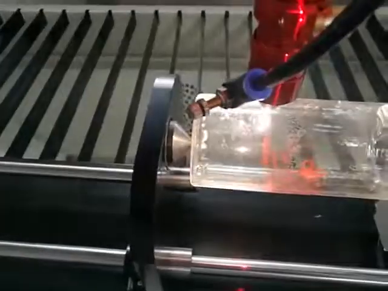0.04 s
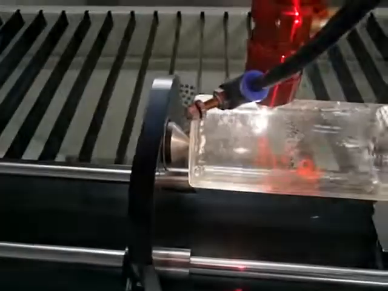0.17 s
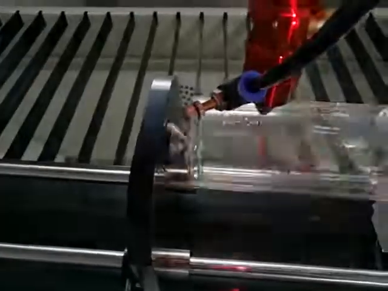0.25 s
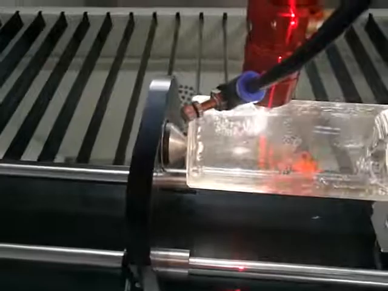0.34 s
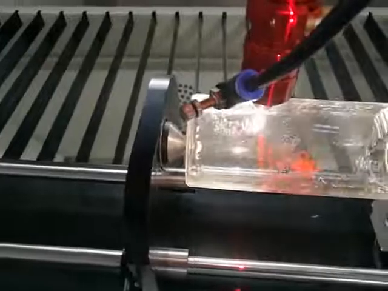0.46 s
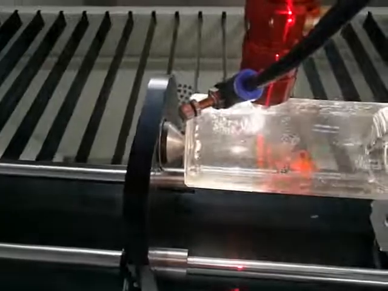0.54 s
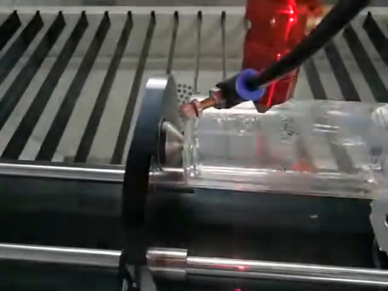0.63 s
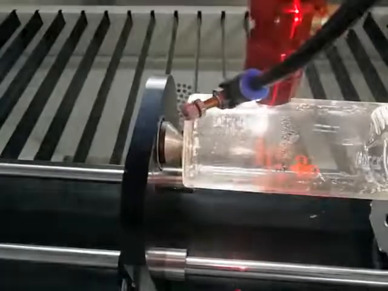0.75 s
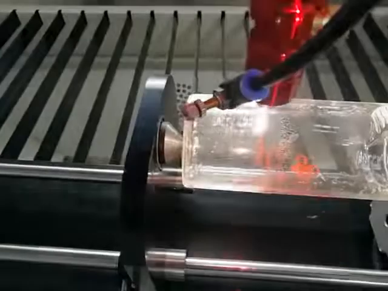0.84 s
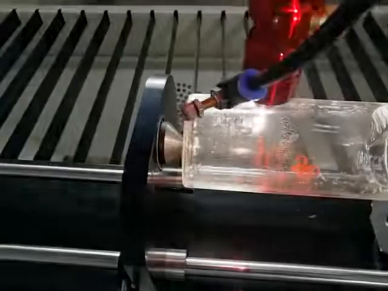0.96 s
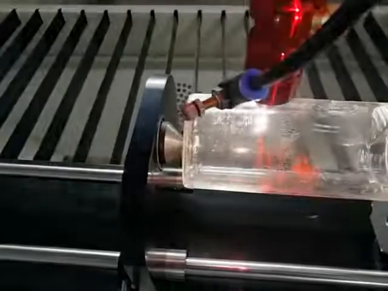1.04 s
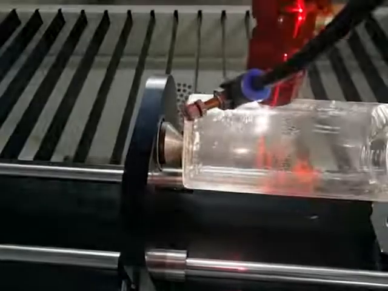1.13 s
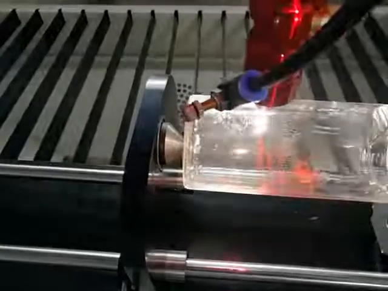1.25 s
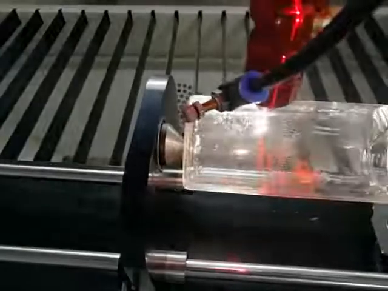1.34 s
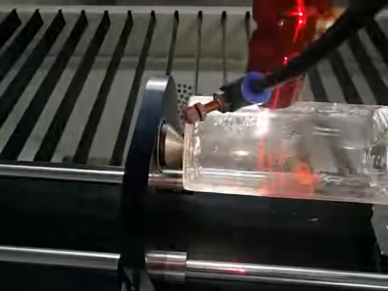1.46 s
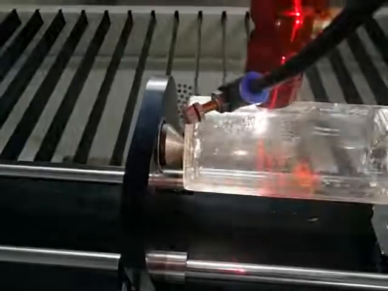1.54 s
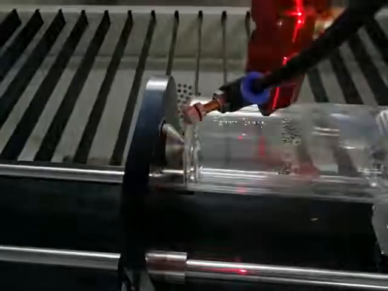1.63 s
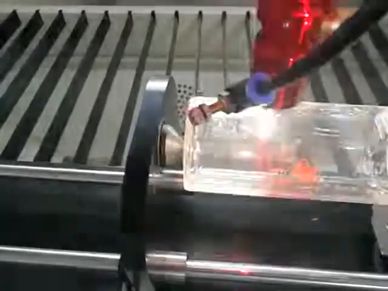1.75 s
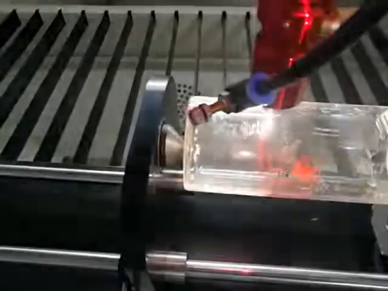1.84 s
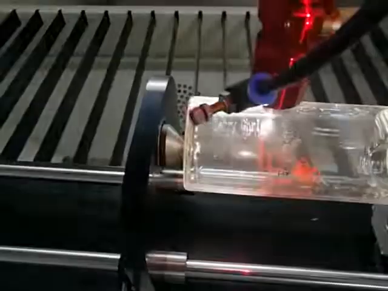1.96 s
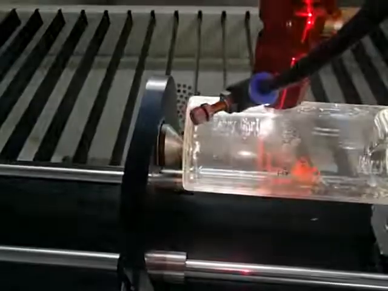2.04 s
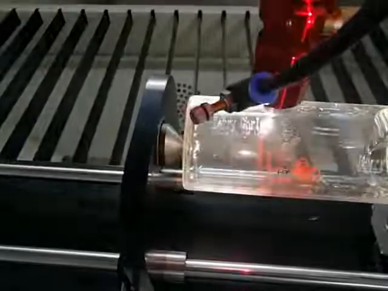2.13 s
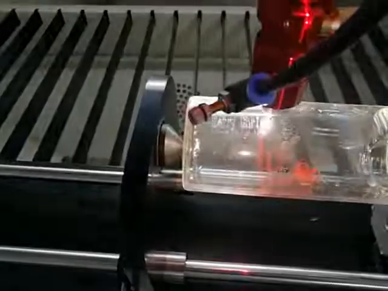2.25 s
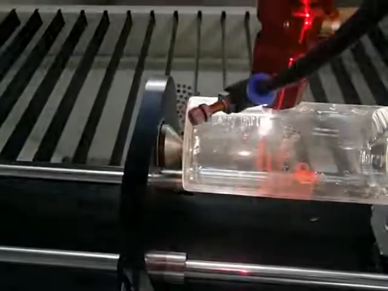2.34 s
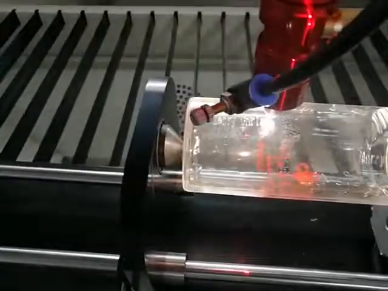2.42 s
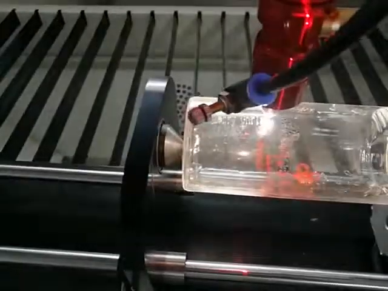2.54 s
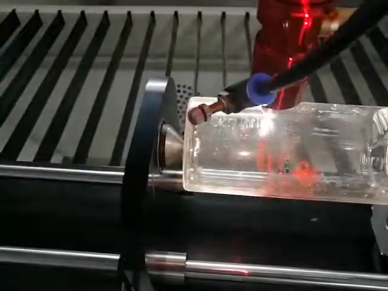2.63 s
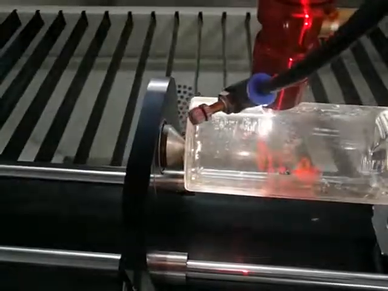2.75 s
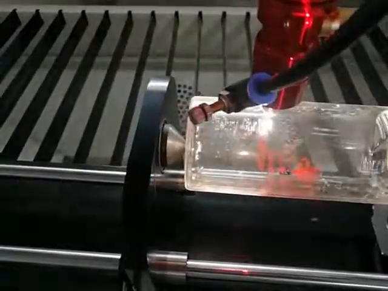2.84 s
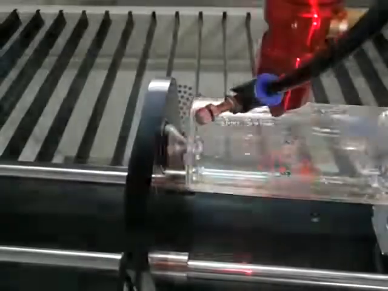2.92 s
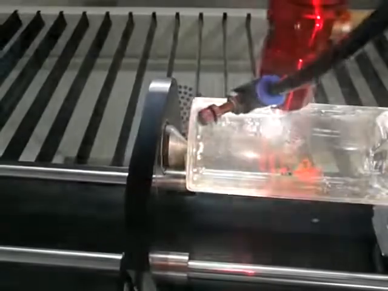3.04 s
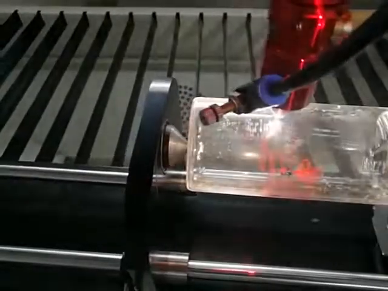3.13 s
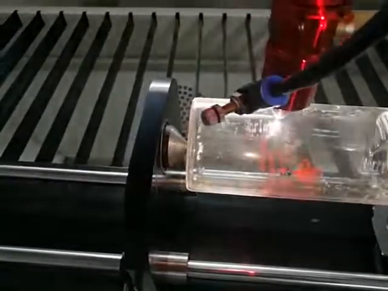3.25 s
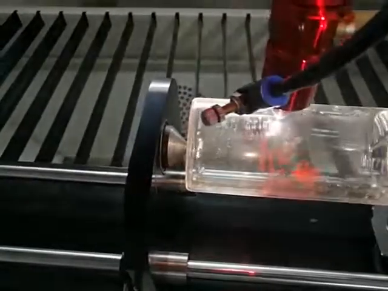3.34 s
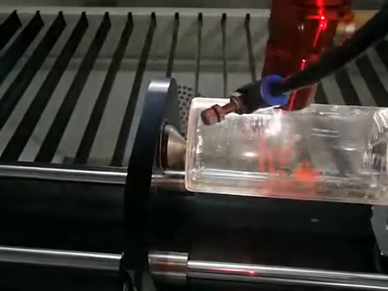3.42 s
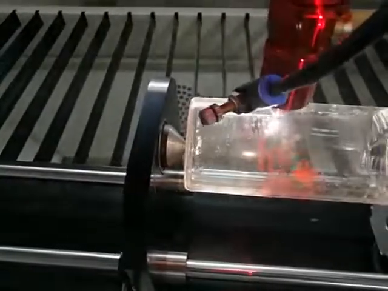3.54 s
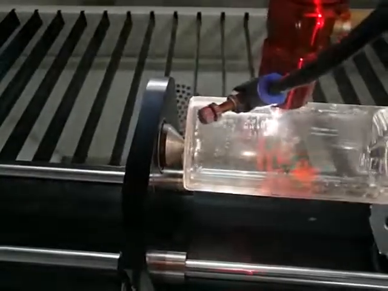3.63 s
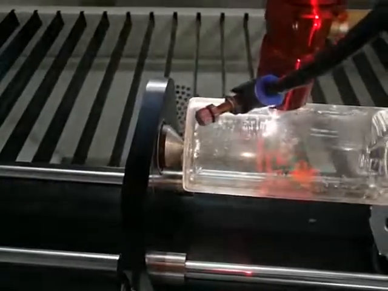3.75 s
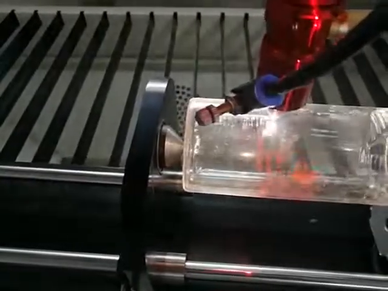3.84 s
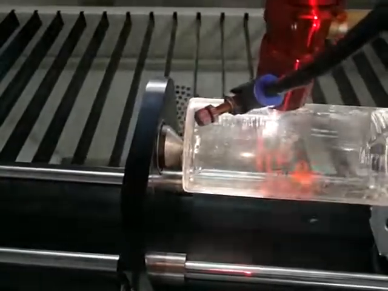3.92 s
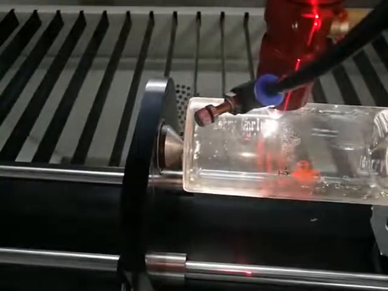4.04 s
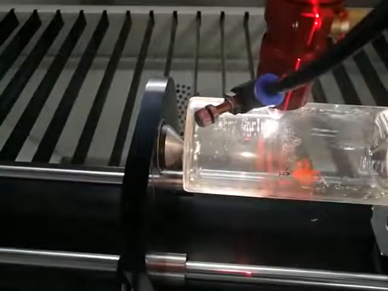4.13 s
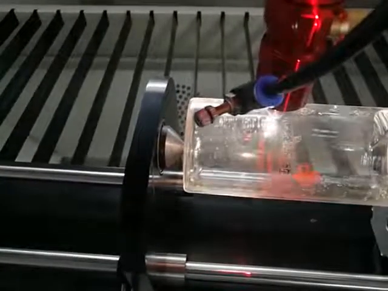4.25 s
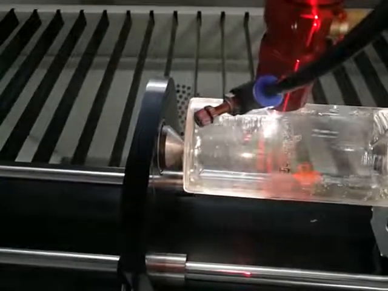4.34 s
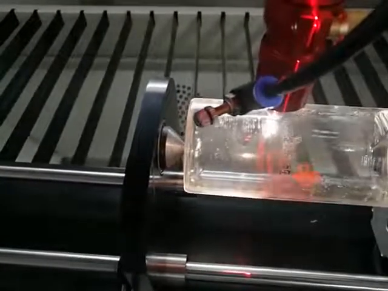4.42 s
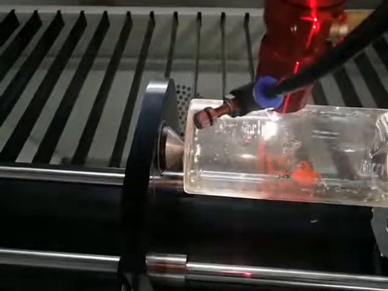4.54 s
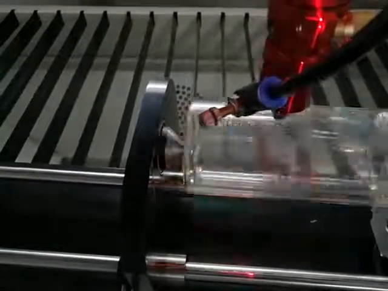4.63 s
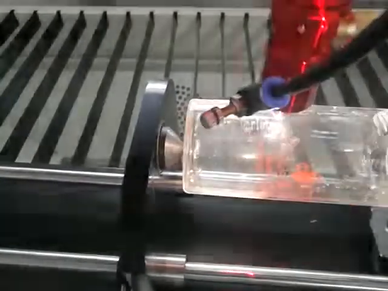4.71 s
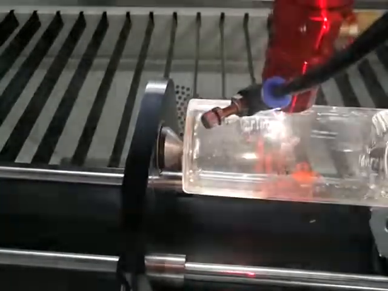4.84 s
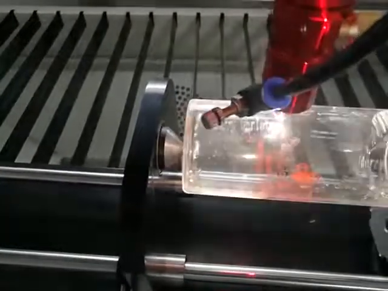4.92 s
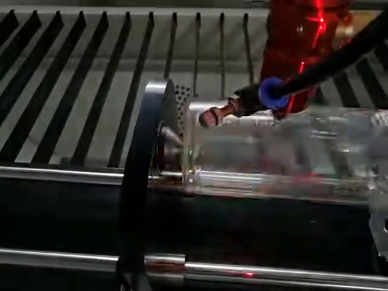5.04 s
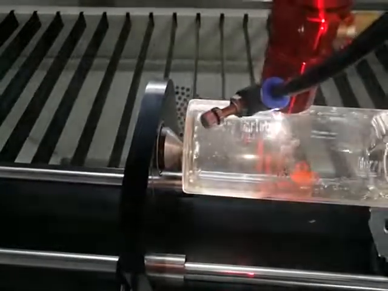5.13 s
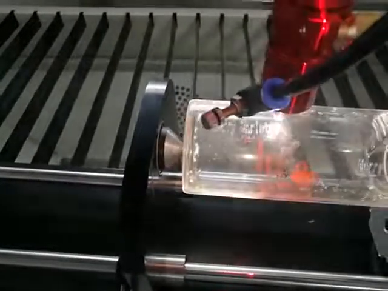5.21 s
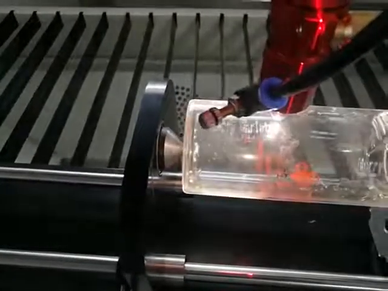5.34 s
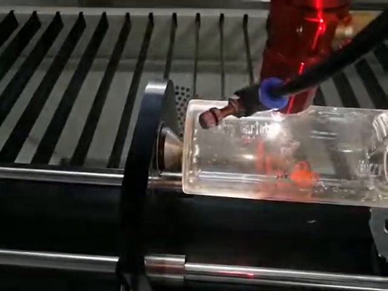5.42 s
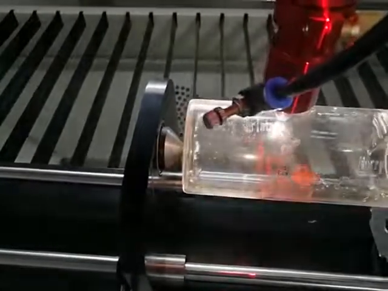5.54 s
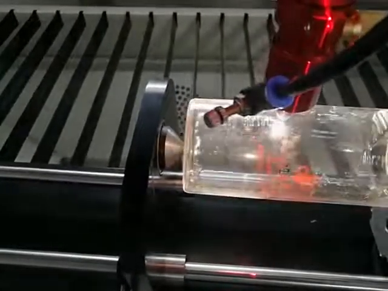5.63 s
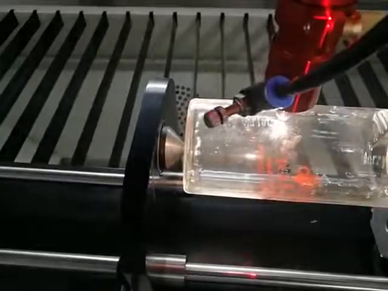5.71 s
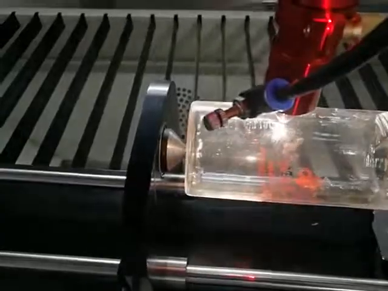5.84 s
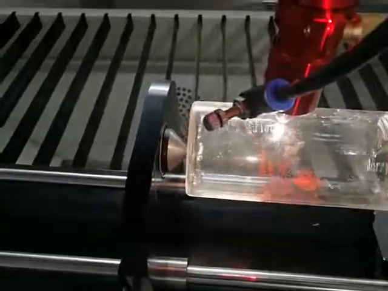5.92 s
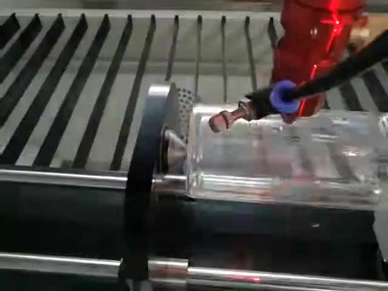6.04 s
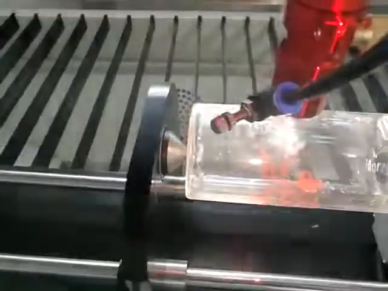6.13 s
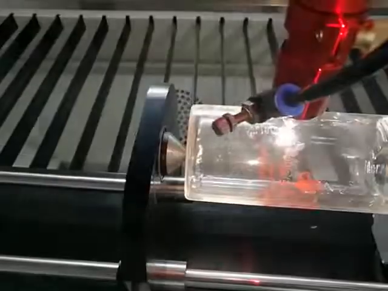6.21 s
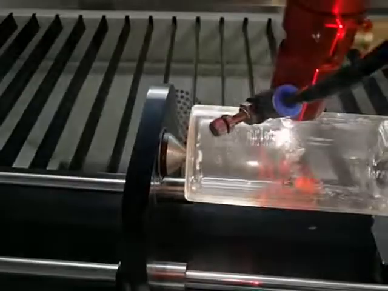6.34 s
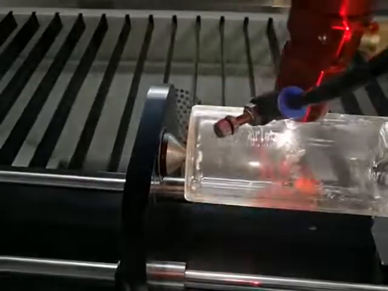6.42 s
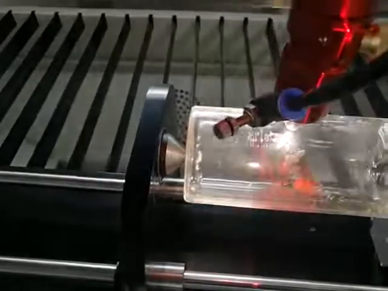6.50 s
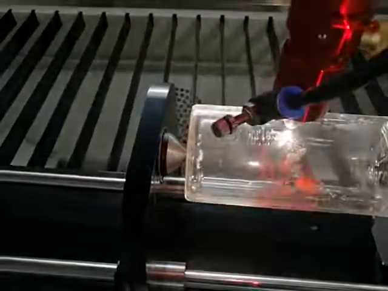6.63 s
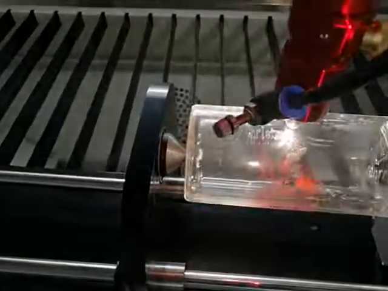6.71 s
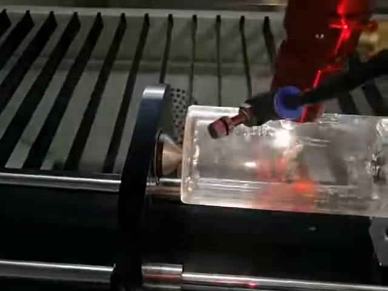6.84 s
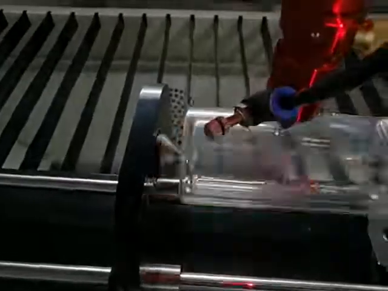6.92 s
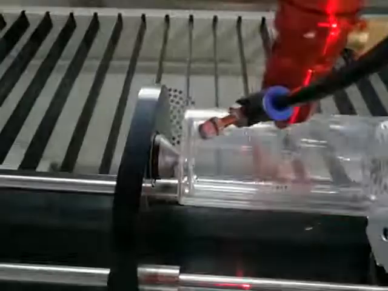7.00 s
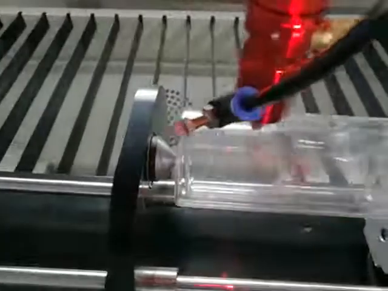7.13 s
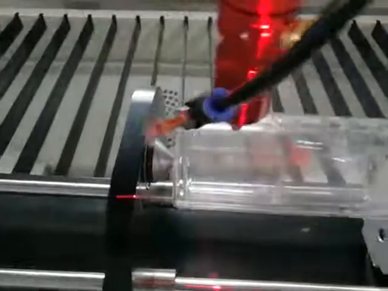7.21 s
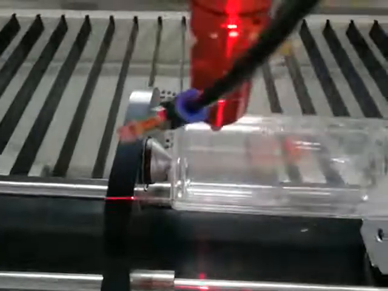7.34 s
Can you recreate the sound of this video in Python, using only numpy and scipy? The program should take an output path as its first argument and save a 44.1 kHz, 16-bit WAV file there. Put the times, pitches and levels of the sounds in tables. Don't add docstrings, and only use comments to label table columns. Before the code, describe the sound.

Sharp bright sizzling in long strokes with brief abrupt gaps, over a low pumping hum and fan rumble, with wind-like gusts thudding the microphone.

```python
import sys
import numpy as np
from scipy import signal
from scipy.fft import rfft, irfft, next_fast_len
from scipy.io import wavfile
from scipy.ndimage import uniform_filter1d

SR = 44100
rng = np.random.default_rng(int(sys.argv[2]) if len(sys.argv) > 2 else 0)


def attenuation_scalar(level_db):
    decades = np.asarray(level_db, float) / 20
    return 10 ** decades


def wav_out(sig):
    wavfile.write(sys.argv[1], SR, np.round(np.clip(np.atleast_2d(sig).T, -1, 1) * 32767).astype(np.int16))


N = 325010
M = next_fast_len(N, True)

# on in seconds, off in seconds, time to strike in seconds.
STROKES = [
    (-.03, 0.284, .02),
    (.361, 0.599, .022),
    (0.715, 1.626, 0.029),
    (1.714, 2.865, 0.016),
    (2.971, 4.58, .007),
    (4.73, 5.049, 0.026),
    (5.104, 5.975, 0.021),
    (6.079, 6.941, .016),
]
# time in seconds, heat in dB, plume leaning to the left port in dB.
SPOT = [(0, -29, 1), (.2, -28.5, 0), (.5, -27.5, -1.5), (1.0, -29.5, 0.2), (1.25, -28.5, 0),
        (1.42, -31.5, 4.5), (1.62, -30.5, 1), (1.8, -29.5, -1), (2.35, -30.5, 1), (2.6, -32.5, -.8),
        (3.1, -29.5, -1.5), (3.55, -29.5, -0.1), (3.75, -32, 4), (4.3, -32, 1), (4.5, -31.5, -1.5),
        (4.9, -28, 0.5), (5.901, -30.5, -2), (6.3, -29.5, -0.5)]
# frequency in Hz, level in dB per Hz.
SIZZLE_COLOUR = [(290, -59.5), (500, -33.5), (607, -27), (705, -38), (729, -28.5), (917, -31.5),
                 (1370, -18), (2110, -3), (2340, -4.5), (2880, -5.5), (4870, -5.5), (5850, -3),
                 (7700, -6.5), (10000, -59), (16900, -120)]
# frequency in Hz, width in Hz, boost in dB.
GLASS_RINGS = [(2140, 280, -1), (2863, 184, 7), (3242, 71, 6.5), (3774, 55, 4.5), (4132, 230, 5.5),
               (5950, 250, 1.5)]
# frequency in Hz, left minus right in dB, likeness 0-1,
# left lead in radians.
SIZZLE_PORTS = [(500, -2, .4, 0), (1200, -1, .9, 0), (1600, -1, .85, 0), (2100, -4, .5, -.1),
                (2600, -1.5, .75, .2), (3700, -2, .75, .35), (4250, -4, .3, 1.2), (4700, 2, .3, 1.7),
                (5300, 9, .35, 2.6), (6000, 6, .3, 3.1), (6400, 0, .35, 3.2), (7500, -5, .2, 3.7)]
# multiple of the pump rate, level in dB rms.
THUMP = [(1, -42), (2, -44.5), (3, -52), (4, -50), (5, -58.5), (6, -75.5), (7, -55.5), (8, -62)]
# frequency in Hz, width in Hz, left in dB, right in dB.
VALVE_RINGS = [(616, 17, -72, -62), (785.5, 20, -68.5, -53), (929, 110, -62, -50.5),
               (1082, 140, -51.5, -63.5), (1538, 110, -61.5, -59)]
# frequency in Hz, level in dB per Hz.
CABINET_COLOUR = [(18, -39), (30, -2.5), (55, -3), (74, -1.5), (142, 0.5), (313, -20), (395, -17),
                  (433, -19.5), (642, -26.5), (869, -19), (1230, -19), (1520, -17), (2900, -16),
                  (7700, -25), (10000, -75), (16900, -120)]
# frequency in Hz, width in Hz, boost in dB.
DUCT_RINGS = [(157, 57, 3.5), (290, 41, 4), (329.5, 30, 10.5), (371, 22, 3)]
# frequency in Hz, left minus right in dB, likeness 0-1,
# left lead in radians.
CABINET_PORTS = [(60, 0, 1, 0), (250, 0, .97, 0), (600, -4, .15, 0), (1200, -2, .8, 0), (2200, -4.5, .1, 0),
                 (2900, -4.5, .4, 0), (3600, 0, .1, 0), (7500, 0, .05, 0)]
# time in seconds, level in dB.
DRAUGHT = [(0, -49), (.55, -51.5), (1.05, -36.5), (1.6, -39), (2.05, -46), (2.5, -47.5), (3.5, -49),
           (4.4, -37), (4.9, -41.5), (5.9, -46.5), (6.3, -39), (7.37, -43.5)]
# start in seconds, peak in dB, hold in seconds.
PUFFS = [
    (0.098, -49, 0.036),
    (.72, -39, .06),
    (2.15, -40, 0.041),
    (2.677, -40.5, .04),
    (3.02, -38.5, .03),
    (3.928, -21.5, 0.19),
    (4.17, -28, 0.11),
    (4.7, -36.5, 0.041),
    (5.505, -37.5, 0.07),
    (7.023, -34.5, 0.11),
]
# frequency in Hz, level in dB per Hz.
BUFFET_COLOUR = [(24, -41.5), (40, -11.5), (74, -16.5), (161, 4), (229, -10.5), (270, -8.5), (366, -12.5),
                 (551, -17), (1040, -21), (1500, -22.5), (2300, -28), (3300, -120)]
# frequency in Hz, left minus right in dB, likeness 0-1,
# left lead in radians.
BUFFET_PORTS = [(60, 0, .97, 0), (120, 0, .86, 0), (240, 0, .88, 0), (340, 0, .3, .5), (490, -.5, .3, 3),
                (900, -1.5, .05, 0)]
# time in seconds, peak in dB, frequency in Hz.
SLAPS = [(0.749, -32, 131), (0.897, -27.5, 136), (1.061, -25.5, 149), (1.204, -25, 138.5),
         (2.707, -28.5, 122), (3.039, -27, 158), (3.929, -21, 94.2), (3.958, -18.5, 126), (3.98, -22, 242),
         (4.001, -21, 130), (4.028, -14, 154), (4.066, -24, 182), (4.093, -15.5, 166), (4.147, -21, 177),
         (4.231, -20.5, 160), (4.262, -20.5, 188), (4.325, -28, 133)]
# frequency in Hz, level in dB per Hz.
CARRIAGE_COLOUR = [(150, -31), (260, -4.5), (420, -2), (700, -3), (1300, -10.5), (2400, -14.5), (4000, -39)]
# frequency in Hz, middle in dB, side in dB.
SILENCE_SHARE = [(100, -20, -12), (300, -14, -13), (600, -8, -14), (1000, -9, -8.5), (1250, -9, -6.5),
                 (1700, -8, -9), (2200, -8, -11), (3000, -6, -8.5), (3600, -5.5, -6), (4100, -6.5, -8),
                 (4600, -7.5, -9), (6000, -8, -8), (6500, -5.5, -8), (7500, -7, -8)]

PUMP_HZ, PUMP_START = 49.969, .03
BODY_PER_LEAN, TREBLE_PER_LEAN, BODY_PER_HEAT, TREBLE_PER_HEAT = .3, .2, -.05, 0.02
LAST_FADE_DB_PER_S, LAST_LEAN_DB_PER_S = -6, -3
WARM_S, COLD_DB, COOL_DB_PER_S = 0.056, -3, 1001
CABINET_DB = -39
PUFF_RISE_S, PUFF_FALL_DB_PER_S, FLUTTER_DB = 0.034, 55.5, 2
STEP_DB, HOME_DB, HOME_S, HOME_RISE_S = -55.5, -51, 7.05, .2


def read(table, hz):
    at, *columns = np.transpose(table)
    return [np.interp(np.log(hz + 1), np.log(at), c) for c in columns]


def level(x, db):
    return x * attenuation_scalar(db) / np.sqrt(np.mean(x ** 2))


def walk(rate):
    k = int(SR / rate)
    steps = np.repeat(rng.standard_normal(N // k + 1), k)
    return 1.74 * uniform_filter1d(uniform_filter1d(steps, k), k)[:N]


def at_ports(sources, colour, peaks, ports):
    hz = np.arange(M // 2 + 1) * SR / M
    db = read(colour, hz)[0]
    db = db + sum(g / (1 + (2 * (hz - f) / w) ** 2) for f, w, g in peaks)
    pan_db, like, lead = read(ports, hz)
    like = np.clip(like, 0, 1)
    side = np.array([[.5], [-.5]])
    shared, *private = rfft(sources)
    both = np.sqrt(like) * shared * np.exp(1j * side * lead)
    both = both + np.sqrt(1 - like) * np.array(private)
    return hz, both * attenuation_scalar(db + side * pan_db)


def bands(hz, spectra, lo_hz, per_octave, count):
    place = np.clip(per_octave * np.log2((hz + 1) / lo_hz), 0, count - 1)
    for k in range(count):
        share = np.clip(1 - abs(place - k), 0, 1)
        yield lo_hz * 2 ** (k / per_octave), irfft(spectra * share, M)[:, :N]


def throb(turns, depth_db, late):
    return attenuation_scalar(depth_db * np.cos(2 * np.pi * (turns - late)))


def beam(t):
    lit = 0
    for on, off, strike in STROKES:
        age = np.clip(t - on, 0, None)
        cold_db = COLD_DB * np.exp(-age / WARM_S)
        cooling_db = COOL_DB_PER_S * np.clip(t - off, 0, None)
        lit = lit + np.minimum(age / strike, 1) * attenuation_scalar(cold_db - cooling_db)
    return lit


def burn(t, turns):
    s, *columns = np.transpose(SPOT)
    heat_db, pan_db = (np.interp(t, s, c) for c in columns)
    late = np.clip(t - s[-1], 0, None)
    heat_db = heat_db + LAST_FADE_DB_PER_S * late
    pan_db = pan_db + LAST_LEAN_DB_PER_S * late
    surplus_db = heat_db - heat_db.mean()
    body_db = BODY_PER_LEAN * pan_db + BODY_PER_HEAT * surplus_db
    treble_db = TREBLE_PER_LEAN * pan_db + TREBLE_PER_HEAT * surplus_db

    crack_size = attenuation_scalar(2.0 * np.minimum(rng.exponential(size=M), 4))
    cracks = rng.standard_normal((3, M)) * crack_size
    hz, spectra = at_ports(cracks, SIZZLE_COLOUR, GLASS_RINGS, SIZZLE_PORTS)
    sizzle = 0
    for f, band in bands(hz, spectra, 1272, per_octave=4.244, count=12):
        bright = np.clip(np.log2(f / 3600) / 0.59, 0, 1)
        flicker_db = 0.33 * walk(3.2) + 1.42 * walk(25) + 0.57 * np.array([walk(9), walk(8.7)])
        sizzle = sizzle + band * attenuation_scalar((f < 2500) * body_db + bright * (treble_db + 0.24) + flicker_db)

    lean = attenuation_scalar(1.1 * np.array([pan_db - .6, .6 - pan_db]) / 2)
    gain = beam(t) * attenuation_scalar(heat_db) * lean
    crackle = attenuation_scalar(0.52 * walk(150) + 0.14 * walk(7))
    return level(sizzle, 4.15) * gain * crackle * throb(turns, depth_db=1.02, late=0.25)


def pump(turns):
    thump = 0
    for k, db in THUMP:
        thump = thump - np.sqrt(2) * attenuation_scalar(db + .5 * walk(8)) * np.sin(2 * np.pi * k * turns)
    strength = np.repeat(attenuation_scalar(1.6 * rng.standard_normal(N // 400 + 1)), 400)[:N]
    knocks = np.diff(np.floor(turns), prepend=0) * strength
    valve = 0
    for f, width, *db in VALVE_RINGS:
        ring = signal.lfilter(*signal.iirpeak(f, f / width, SR), -knocks)
        valve = valve + level(ring, 0) * attenuation_scalar(np.array(db))[:, None]
    return thump + valve


def cabinet(turns):
    hz, spectra = at_ports(rng.standard_normal((3, M)), CABINET_COLOUR, DUCT_RINGS, CABINET_PORTS)
    spectra = spectra / np.std(irfft(spectra * (hz > 400), M))
    moved_off = turns > HOME_S * PUMP_HZ
    out = 0
    for f, band in bands(hz, spectra, 40, per_octave=1.5, count=12):
        jet = np.clip(np.log2(f / 500) / 0.76, 0, 1) * np.clip(np.log2(9000 / f) / 1.5, 0, 1)
        rumble_db = -6. * (90 < f < 300) - 3.6 * (f < 60) - 2.7 * (60 < f < 90)
        hiss_db = (f > 3300) * (1.2 * walk(12) - 2.4 * moved_off)
        gain = attenuation_scalar(rumble_db + 0.27 * walk(1) + hiss_db)
        out = out + band * gain * throb(turns, depth_db=4.2 * jet, late=0.39)
    return out * attenuation_scalar(CABINET_DB - .5)


def airflow(t):
    power = attenuation_scalar(np.interp(t, *np.transpose(DRAUGHT)) + FLUTTER_DB * walk(11)) ** 2
    for at, peak_db, hold in PUFFS:
        fade_db = PUFF_FALL_DB_PER_S * np.clip(t - at - PUFF_RISE_S - hold, 0, None)
        rise = np.clip((t - at) / PUFF_RISE_S, 0, 1)
        power = power + (rise * attenuation_scalar(peak_db - fade_db)) ** 2
    return 10 * np.log10(power)


def draught(t):
    flow_db = airflow(t)
    gust = attenuation_scalar(flow_db - flow_db.max())
    hollows = [(277, 45, 2), (360, 53, 0.5), (676, 240, -5)]  # Hz, width Hz, dB
    hz, spectra = at_ports(rng.standard_normal((3, M)), BUFFET_COLOUR, hollows, BUFFET_PORTS)
    out = 0
    for f, band in bands(hz, spectra, 60, per_octave=0.91, count=6):
        if 100 < f < 200:
            reach = 1 - 0.6 * gust
        elif f < 400:
            reach = gust ** 0.27
        else:
            smooth_gust = uniform_filter1d(gust, size=3001, origin=1200)
            reach = smooth_gust ** 0.5 * attenuation_scalar(1.4 + 1.4 * walk(12))
        out = out + band * reach * attenuation_scalar(2.5 * walk(25))
    out = out / np.std(irfft(spectra, M)) * attenuation_scalar(flow_db - 2.5)
    skew = np.array([[-1], [1]]) * 0.00015  # s, the eddy passes one port first
    for at, peak_db, f in SLAPS:
        age = np.clip(t - at, 0, None) / 0.007
        swell = age * np.exp(1 - age)
        out = out + attenuation_scalar(peak_db - 1.2) * swell * np.sin(2 * np.pi * f * (t - at - skew))
    return out


def carriage(t):
    spectra = at_ports(rng.standard_normal((3, M)), CARRIAGE_COLOUR, [], CABINET_PORTS)[1]
    stepping = attenuation_scalar(STEP_DB) * np.clip(1 - 2 * beam(t), 0, 1)
    homing = attenuation_scalar(HOME_DB) * np.clip((t - HOME_S) / HOME_RISE_S, 0, 1)
    return level(irfft(spectra, M)[:, :N], 0) * (stepping + homing) * attenuation_scalar(1.5 * walk(18))


def scene():
    t = np.arange(N) / SR
    turns = PUMP_HZ * t + PUMP_START
    return burn(t, turns) + pump(turns) + cabinet(turns) + draught(t) + carriage(t)


def silence_weak_bands(x):
    hz, _, z = signal.stft(x, SR, nperseg=1024, noverlap=768)
    band = np.floor(np.minimum(hz / 170, 16 * np.log2(hz / 1700 + 1))).astype(int)
    member = (band == np.arange(band.max() + 1)[:, None]) * 1.
    lines = np.maximum(member.sum(1), 1)
    band_power = member @ abs(z) ** 2
    power = uniform_filter1d(band_power, size=8) + 1e-18
    held = np.arange(z.shape[-1]) // 4 * 4
    quick, slow = rng.standard_normal((2, *power.shape))
    slow = uniform_filter1d(uniform_filter1d(slow, size=3, axis=1), size=24)
    bass_db = 10 * np.log10(power[:, :3].sum((0, 1)) / power.sum((0, 1)))
    extra_bass_db = bass_db - np.median(bass_db)
    treble = (member @ hz / lines > 3300)[:, None]
    robbed_db = np.clip(.22 * extra_bass_db, 0, .8) * treble
    lowest = (np.arange(len(member)) < 2)[:, None]
    given_db = np.clip(2.5 * (extra_bass_db - 3.5), -2, 10) * lowest
    luck_db = 1.5 * quick + 1.2 * slow / slow.std() - robbed_db + given_db
    share_db = 10 * np.log10(power / power.sum(0))
    limit_db = np.array(read(SILENCE_SHARE, hz))[..., None]
    empty = (share_db + luck_db)[..., held][:, band] < limit_db
    usual = np.minimum(power, band_power) / lines[:, None]
    faint = abs(z) ** 2 < .3 * usual[:, band]
    empty |= faint & (hz > 400)[:, None]
    keep = np.where(empty, attenuation_scalar(-50), 1) * (hz < 7510)[:, None]
    return signal.istft(z * keep, SR, nperseg=1024, noverlap=768)[1][:, :N]


def band_limit(x):
    return signal.sosfilt(signal.butter(12, 8780, fs=SR, output="sos"), x)


def record(dry):
    mid, side = (dry[0] + dry[1]) / 2, (dry[0] - dry[1]) / 2
    side = signal.sosfilt(signal.butter(2, 90, "high", fs=SR, output="sos"), side)
    mid, side = silence_weak_bands(np.array([mid, side]))
    return band_limit(np.array([mid + side, mid - side]))


dry = scene()
out = record(dry)
wav_out(out)
```